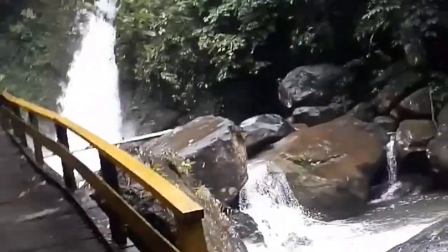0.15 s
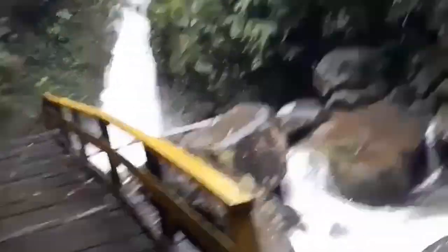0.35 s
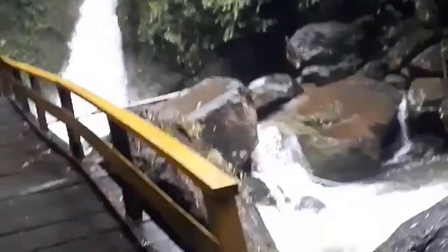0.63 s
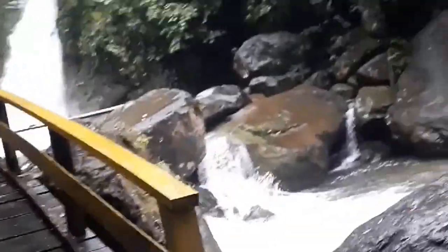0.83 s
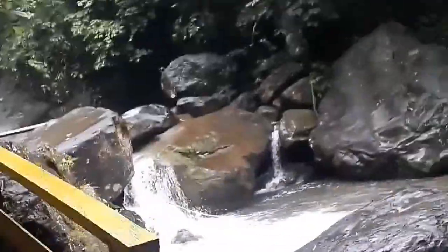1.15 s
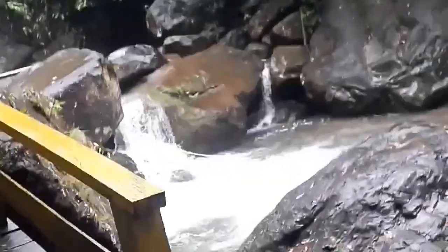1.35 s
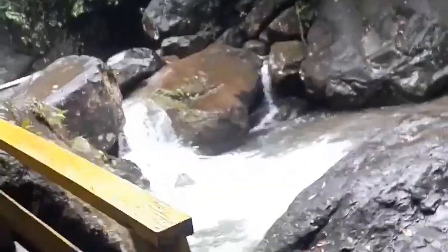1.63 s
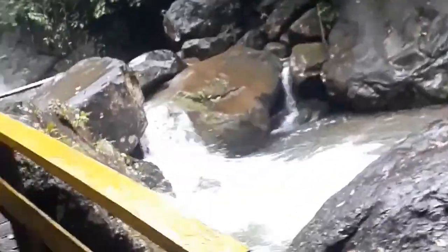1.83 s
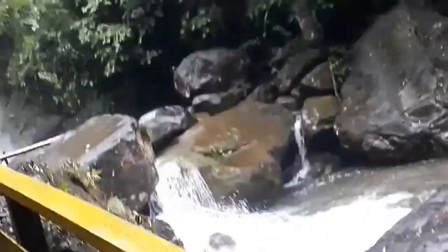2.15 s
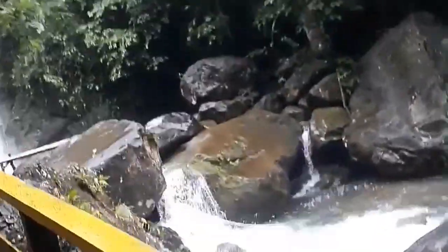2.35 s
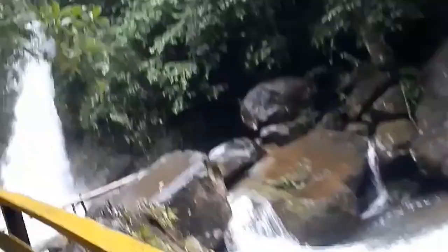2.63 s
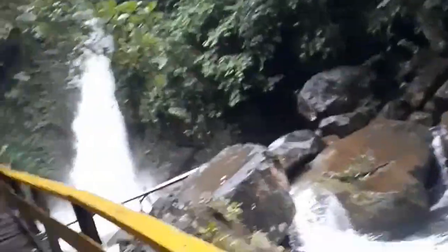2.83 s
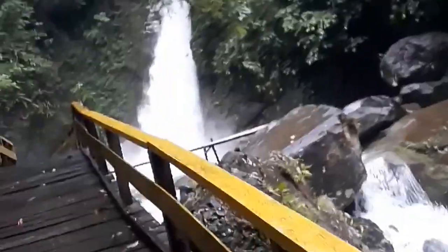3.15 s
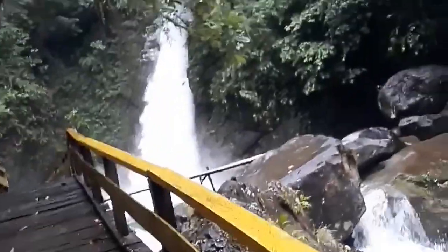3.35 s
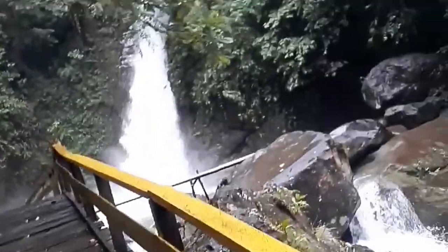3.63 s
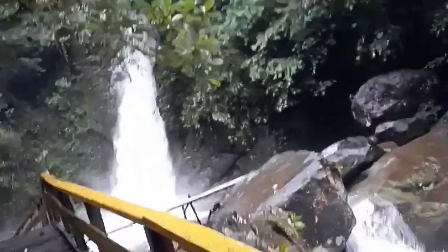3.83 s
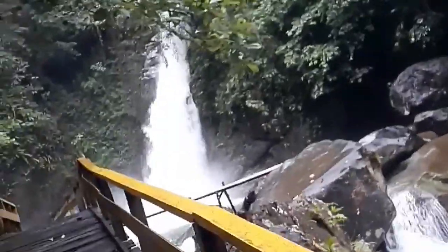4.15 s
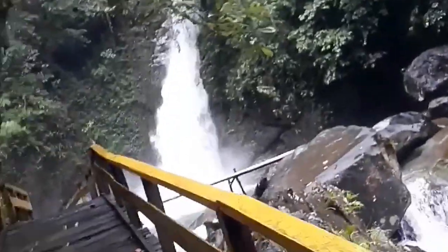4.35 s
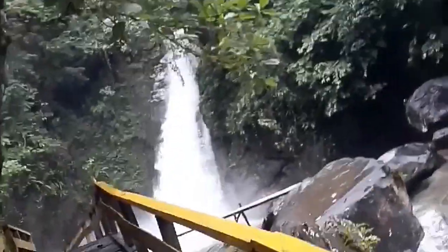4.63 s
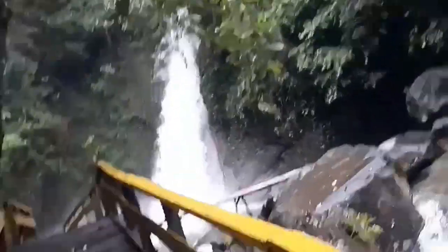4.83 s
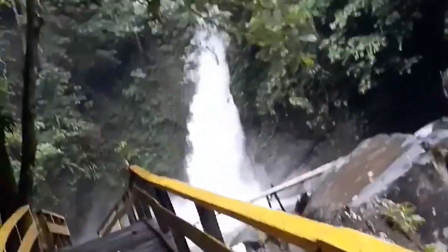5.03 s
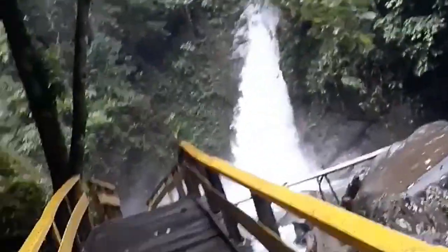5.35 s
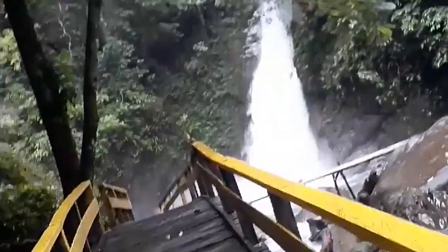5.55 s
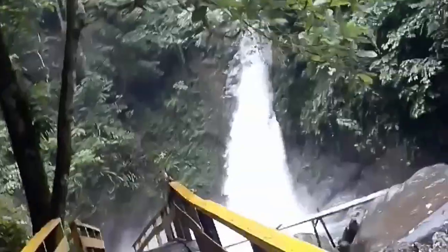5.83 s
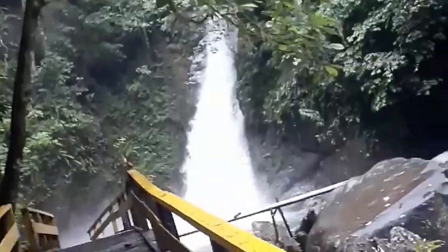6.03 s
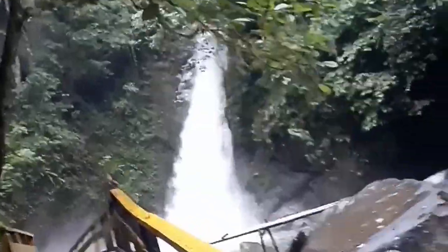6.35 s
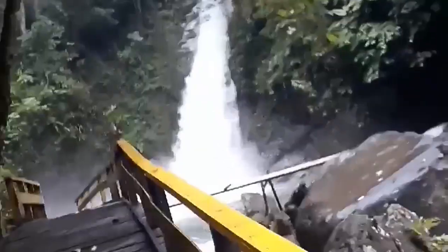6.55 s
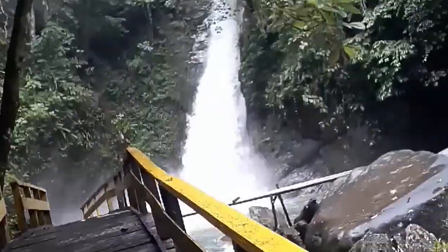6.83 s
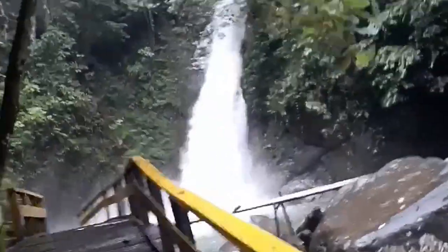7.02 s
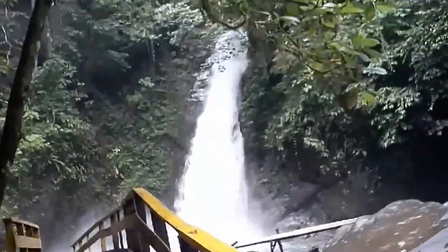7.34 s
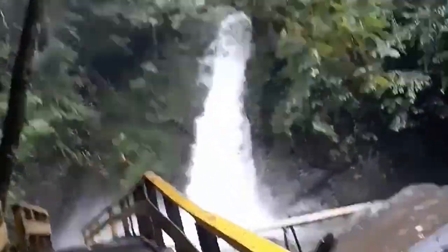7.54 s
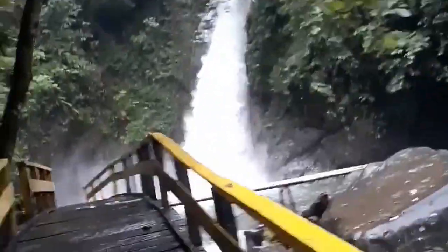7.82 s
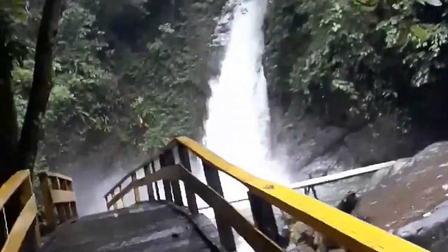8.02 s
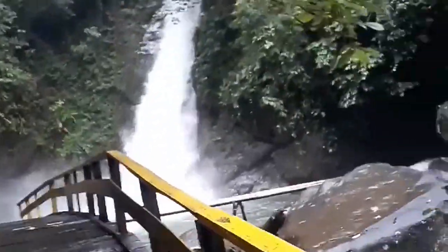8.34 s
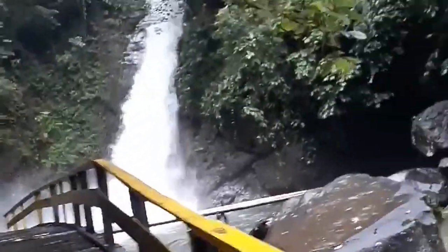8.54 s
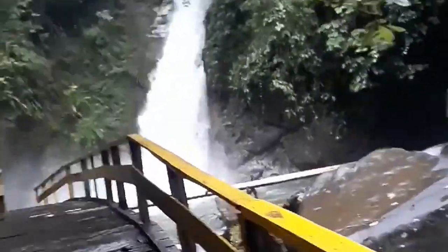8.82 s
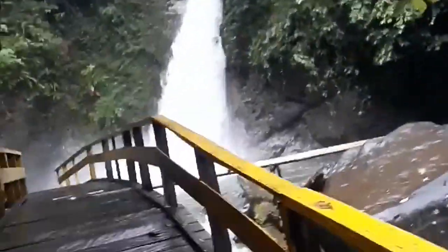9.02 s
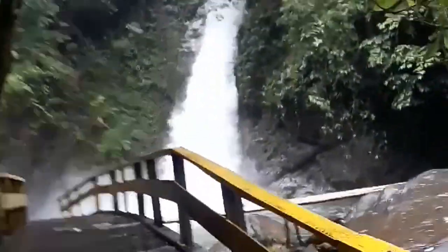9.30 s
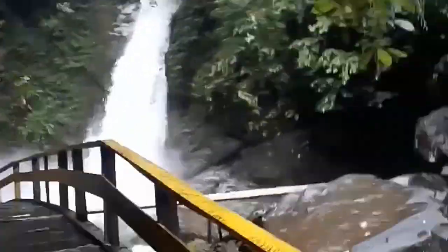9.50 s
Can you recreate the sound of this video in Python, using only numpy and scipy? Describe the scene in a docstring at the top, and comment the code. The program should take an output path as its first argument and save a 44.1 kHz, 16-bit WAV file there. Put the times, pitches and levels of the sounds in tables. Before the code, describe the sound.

A big waterfall roars steadily into a rocky pool while a finger thumps and rubs the microphone, making the sound duck and briefly cut out.

```python
"""Waterfall with a finger on the microphone

A big waterfall roars into a rocky pool, with a small cascade among the near boulders, heard from a
footbridge through a hand-held stereo camera. The water is shaped noise plus thousands of bubble pings.
A finger seals the left port, rubs on it and lets go: damped swings of trapped air and muffled slips.
Its two hardest bumps overload the recorder, which turns itself down for about a second each time;
once the sound cuts out briefly."""
import sys
import numpy as np
from scipy import signal
from scipy.fft import rfft, irfft
from scipy.io import wavfile
from scipy.ndimage import uniform_filter1d, minimum_filter1d

SR = 44100
rng = np.random.default_rng(int(sys.argv[2]) if len(sys.argv) > 2 else 0)


def master_out(mix):
    """Clip the mix to full scale and print it as 16-bit PCM to the path in sys.argv[1]."""
    frames = np.transpose(np.atleast_2d(mix))
    ceiling = np.clip(frames, -1, 1)
    pcm = np.round(ceiling * 32767).astype(np.int16)
    wavfile.write(sys.argv[1], SR, pcm)


N = 426447
TIME = np.arange(N) / SR

# relative spectrum of the falling water: (frequency [Hz], density [dB per Hz])
FALL_SPECTRUM = [(25, -27.6), (50, -15), (95, -1.8), (220, 0.7), (340, -2.3), (480, -5.7), (720, -4.1),
                 (1000, -6.8), (1800, -8.5), (2800, -11.1), (4600, -13.2), (8800, -19.9), (10500, -19.4),
                 (15000, -29.7)]
# level of the roar as the camera swings about: (time [s], level [dB])
ROAR_LEVEL = [(0, -0.65), (2.1, 1.9), (3, 0.1), (5, -0.26), (6, .5), (7.4, -0.26), (9.67, 0.3)]
# the two microphone ports: (frequency [Hz], likeness [0-1], lead of the right port [rad])
PORT_LIKENESS = [(40, 0.97, -0.086), (300, 0.99, 0.024), (520, 0.85, -0.054), (790, 0.97, 0.41),
                 (1270, 0.46, 0.32), (1700, 0.44, -0.63), (1960, 0.25, -1.1), (3500, 0.03, 0.84),
                 (6000, 0, 0.44)]
# left port with a resonating slit under the finger: (frequency [Hz], gain [dB])
LEFT_SLIT = [(100, -7.5), (500, -1.5), (1300, -2.0), (2000, 2.5), (2900, 8.5), (3500, -0.5), (4500, -11.9),
             (6200, -13.5), (8200, -17.1), (15000, -12)]
# left port sealed by the finger: (frequency [Hz], gain [dB])
LEFT_SEALED = [(100, -18), (500, -44), (1500, -52), (8500, -40), (10500, -29), (15000, -28.5)]
# left port with the finger beside it: (frequency [Hz], gain [dB])
LEFT_BESIDE = [(600, -0.7), (1600, 2.8), (2100, 0.3), (2750, -4.1), (4000, 3.6), (4700, 1.9), (5900, -1.8),
               (7600, 2.8), (9000, -0.7), (10500, 1.6), (13000, 0.7)]
# left port with the finger away: (frequency [Hz], gain [dB])
LEFT_BARE = [(20, 0), (16000, 0)]
# the finger seals the left port, lifts to its side, moves away: (start [s], duration [s])
FINGER_MOVES = [(0.471, .09), (2.226, 0.033), (6.42, 0.3)]
# right port aimed at the pool, rippled by reflections: (frequency [Hz], gain [dB])
RIGHT_AT_POOL = [(500, -3), (1000, 0), (2200, 1.5), (2900, -2.5), (4400, 1.2), (5400, -1.5), (6500, 1),
                 (7900, 2), (9000, -7.5), (12500, -1)]
# right port aimed at the rocks: (frequency [Hz], gain [dB])
RIGHT_AT_ROCKS = [(500, -1.9), (1400, 3), (2000, 2.5), (2700, -4.5), (3600, 1.5), (4900, 1.5), (6100, -1.5),
                  (7700, 3.5), (9000, -3.5), (11500, -1)]
# right port aimed at the fall: (frequency [Hz], gain [dB])
RIGHT_AT_FALL = [(700, -0.4), (1300, 2.2), (2000, 4.6), (2800, -3.8), (5000, 2.9), (5900, -0.9),
                 (7600, 1.9), (9200, -3.6), (11500, 0.2)]
# the camera turns to the rocks, then to the fall: (start [s], duration [s])
CAMERA_TURNS = [(2.297, 0.53), (4.7, 0.95)]
# the finger bumps the port: (time [s], level [dB], pitch [Hz], tick relative to that level [dB])
FINGER_BUMPS = [(0.451, 6, 258, -14), (.456, 16.5, 175, -12), (0.475, 4, 130, -11), (0.496, 1, 71, -13),
                (0.529, -2, 100, -18), (0.648, -12, 124, -18), (1.384, -4, 109, -36), (1.733, -11, 62, -28),
                (1.856, -13, 230, -1), (2.223, -3.5, 80, -24), (2.238, -16, 200, 5),
                (2.248, 14.5, 130, -15)]
# strokes of the finger over the port: (hardest press [s], level there [dB], time to fade [s])
FINGER_STROKES = [(.475, -6.5, .12), (.61, -25.5, 0.54), (.95, -35.5, 0.51), (1.175, -37, .08),
                  (1.39, -22, 0.088), (1.56, -40, .6), (1.742, -25, .09), (1.872, -26, 0.15),
                  (2.1, -42, .5), (2.243, -8.5, 0.044)]
# relative spectrum of rubbing through soft flesh: (frequency [Hz], density [dB per Hz])
SKIN_SPECTRUM = [(10, -20), (30, -5), (60, 3), (150, 1.5), (400, -7.5), (1000, -20.5), (3000, -38),
                 (8000, -55), (15000, -55)]


def gain_of(db):
    """Decibels to an amplitude factor."""
    return 10 ** (np.asarray(db) / 20)


def evened(x):
    """Scales a signal to rms 1."""
    return x / np.sqrt(np.mean(x ** 2) + 1e-20)


def read(points, hz):
    """Each column of a spectrum table at the given frequencies, interpolated over log frequency."""
    f, *columns = np.transpose(points)
    return np.squeeze([np.interp(np.log(hz + 1), np.log(f + 1), column) for column in columns])


def coloured(x, points):
    """Filters a sound by a spectrum table."""
    gain = gain_of(read(points, np.fft.rfftfreq(N, 1 / SR)))
    return irfft(rfft(x) * gain, N)


def patches(size):
    """A smooth random field of rms 1, with patches of the given size (frames, bins)."""
    field = rng.standard_normal((N // 256 + 5, 513))
    field = uniform_filter1d(field, size[0], 0)
    return evened(uniform_filter1d(field, size[1], 1))


def add(mix, start_s, sound):
    """Mixes a sound in at a time, cut off at the end of the mix."""
    part = mix[round(start_s * SR):][:len(sound)]
    part += sound[:len(part)]


def roar(level_db=-23, lump_db=0.4, patch_db=1., flicker_db=0.62, plunge_hz=420, spray_hz=4000,
         plunge_db_per_s=0.08, spray_db_per_s=-0.12):
    """Countless bubbles merge into a wash: clumps of water swell the bass, sheets of spray flicker on top."""
    t = np.arange(N // 256 + 5) * 256 / SR
    hz = np.fft.rfftfreq(1024, 1 / SR)
    a, b, c, d = rng.standard_normal((4, len(t), len(hz)))

    # long waves reach both ports nearly alike, short ones do not
    likeness, lead = read(PORT_LIKENESS, hz)
    likeness = np.clip(likeness, 0, 1)
    right = a + 1j * b
    unlike = c + 1j * d
    left = (likeness * right + np.sqrt(1 - likeness ** 2) * unlike) * np.exp(-1j * lead)

    # walking along the bridge: the plunge grows, the spray of the near cascade falls behind
    plunge_share = 1 / (1 + (hz / plunge_hz) ** 4)
    spray_share = hz ** 2 / (hz ** 2 + spray_hz ** 2)
    walked_s = (t - t.mean())[:, None]
    swing_db = np.interp(t, *np.transpose(ROAR_LEVEL))[:, None]
    field_db = read(FALL_SPECTRUM, hz) + swing_db + patch_db * patches(size=(9, 14))
    field_db = field_db + plunge_share * (plunge_db_per_s * walked_s + lump_db * patches(size=(22, 6)))
    field_db = field_db + spray_share * (spray_db_per_s * walked_s + flicker_db * patches(size=(3, 260)))

    spectra = np.array([left.T, right.T]) * gain_of(field_db.T)
    wash = signal.istft(spectra, nperseg=1024, noverlap=768)[1][:, :N]
    return gain_of(level_db) * evened(wash)


def splashes(level_db=-39, per_s=3000, spread_db=3.5, cycles=3.8, low_hz=900, high_hz=14000, count=28):
    """A small cascade among the near boulders: bursting bubbles, each a ping a few cycles long."""
    t, out = np.arange(1024) / SR, np.zeros((2, N))
    for k, hz in enumerate(np.geomspace(low_hz, high_hz, count)):
        ping = hz * np.sin(2 * np.pi * hz * t) * np.exp(-t * hz / cycles)  # shorter pings are taller
        bursts = np.flatnonzero(rng.random(N) < per_s / count / SR)
        burst_db = spread_db * np.minimum(rng.exponential(1, N)[bursts], 5)
        train = np.zeros(N)
        train[bursts] = gain_of(burst_db)
        out[k % 2] += signal.oaconvolve(train, ping)[:N]  # pitches alternate between left and right
    return gain_of(level_db) * evened(coloured(out, FALL_SPECTRUM))


def port(x, colours, changes):
    """What covers or faces a microphone port colours it; the spectra crossfade in dB at each change."""
    hz, t, spectra = signal.stft(x, SR, nperseg=512, noverlap=384)
    colour_db = read(colours[0], hz)[:, None]
    for (start_s, duration_s), colour in zip(changes, colours[1:]):
        done = np.clip((t - start_s) / duration_s, 0, 1)
        colour_db = (1 - done) * colour_db + done * read(colour, hz)[:, None]
    return signal.istft(spectra * gain_of(colour_db), SR, nperseg=512, noverlap=384)[1][:N]


def finger_bumps(tick_s=0.00072, tick_hz=2300, knock_hz=760, knock_db=-13, knock_s=0.0016, swing_cycles=0.5):
    """Each bump pumps the air trapped in the port: a tick, a knock of the casing and a low, damped swing."""
    t, out = np.arange(SR // 8) / SR, np.zeros(N)
    soften = signal.butter(2, tick_hz, fs=SR)
    knock = gain_of(knock_db) * np.sin(2 * np.pi * knock_hz * t) * np.exp(-t / knock_s)
    for start_s, db, hz, tick_db in FINGER_BUMPS:
        swing = np.sin(2 * np.pi * hz * t) * np.exp(-t * hz / swing_cycles)  # to 1/e in swing_cycles
        noise = evened(signal.lfilter(*soften, rng.standard_normal(len(t))))
        tick = gain_of(tick_db) * noise * np.exp(-t / tick_s)
        add(out, start_s, gain_of(db) * (tick + knock - swing))
    return out


def finger_rub(slips_per_s=500, smooth=0.65, fade_db=30.5, rise_share=0.63):
    """From the first bump on, skin sticks and slips on the casing, stroke by stroke, muffled by the flesh."""
    slips = rng.standard_normal(N) * (rng.random(N) < slips_per_s / SR)
    friction = evened(slips) + smooth * rng.standard_normal(N)
    pressure = np.zeros(N)
    for press_s, db, fade_s in FINGER_STROKES:
        # 1 = fade_db below the press; pressing takes rise_share of the fading time
        away = np.maximum(TIME - press_s, (press_s - TIME) / rise_share) / fade_s
        pressure = np.maximum(pressure, gain_of(db - fade_db * np.minimum(away, 10)))
    touching = TIME > FINGER_BUMPS[0][0]
    return evened(coloured(friction, SKIN_SPECTRUM)) * pressure * touching


def scene(lowest_hz=60, handling_lowest_hz=40):
    """Water at both ports of the camera, the finger on the left one."""
    no_sub_bass = signal.butter(3, lowest_hz, "highpass", fs=SR, output="sos")
    air_leak = signal.butter(2, handling_lowest_hz, "highpass", fs=SR, output="sos")
    left, right = signal.sosfilt(no_sub_bass, roar() + splashes())
    handling = signal.sosfilt(air_leak, finger_bumps() + finger_rub())
    left = port(left, [LEFT_SLIT, LEFT_SEALED, LEFT_BESIDE, LEFT_BARE], FINGER_MOVES) + handling
    right = port(right, [RIGHT_AT_POOL, RIGHT_AT_ROCKS, RIGHT_AT_FALL], CAMERA_TURNS)
    return np.array([left, right])


def overload_guard(x, threshold=.28, duck_db=-15.5, hold_s=1.093, glide_s=.062):
    """After a few milliseconds far above the usual level the gain glides down, waits, and glides back."""
    overloaded = uniform_filter1d(abs(x).max(0), size=130) > threshold
    last_s = np.maximum.accumulate(np.where(overloaded, TIME, -np.inf))
    ducking = (TIME - last_s < hold_s) * 1.
    r = np.exp(-1 / (glide_s * SR))
    for _ in range(2):  # two smoothing stages round the glide
        ducking = signal.lfilter([1 - r], [1, -r], ducking)
    return x * (1 - ducking * (1 - gain_of(duck_db)))


def limiter(x, ceiling=.95, release_db_per_s=900):
    """Looks a few milliseconds ahead and pulls both channels down under each peak."""
    peak = -minimum_filter1d(-abs(x).max(0), size=300)
    over_db = 20 * np.log10(np.maximum(peak / ceiling, 1))
    release_db = TIME * release_db_per_s
    held_db = np.maximum.accumulate(over_db + release_db) - release_db
    return x / gain_of(uniform_filter1d(held_db, size=200))


def dropout(x, start_s=1.008, end_s=1.146):
    """Both channels fall silent briefly."""
    running = (TIME < start_s) | (TIME > end_s)
    return x * running


def record(dry, edge_hz=15800):
    """Overload guard and limiter, a short dropout, then a steep treble limit."""
    out = dropout(limiter(overload_guard(dry)))
    band_limit = signal.firwin(701, edge_hz, window=("kaiser", 9), fs=SR)
    return signal.oaconvolve(out, band_limit[None], "same")


dry = scene()
out = record(dry)
master_out(out)
```